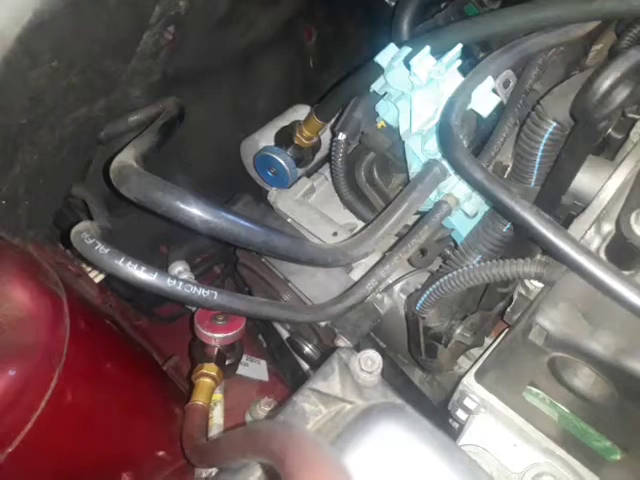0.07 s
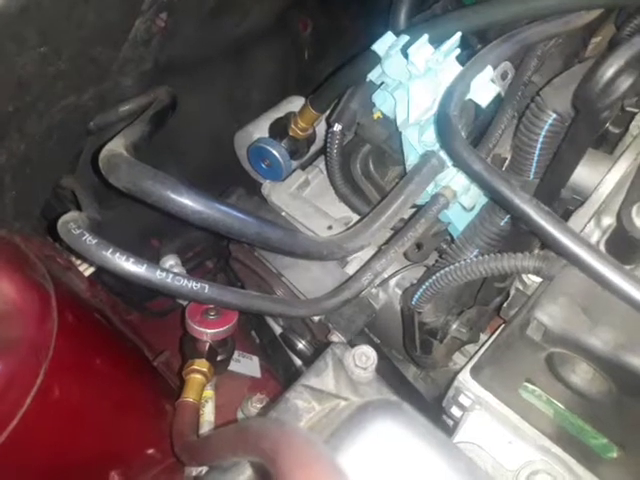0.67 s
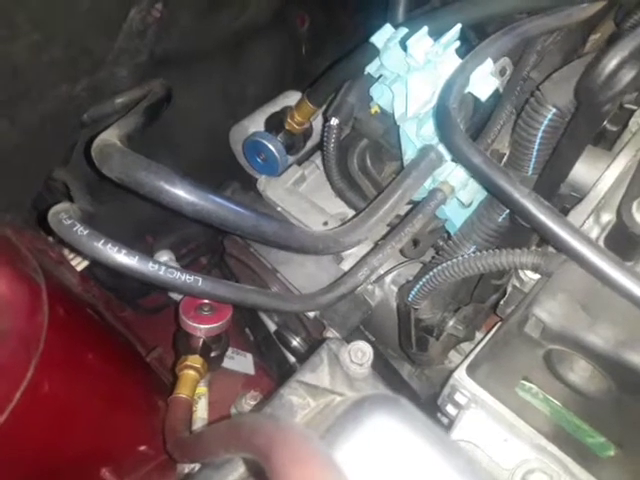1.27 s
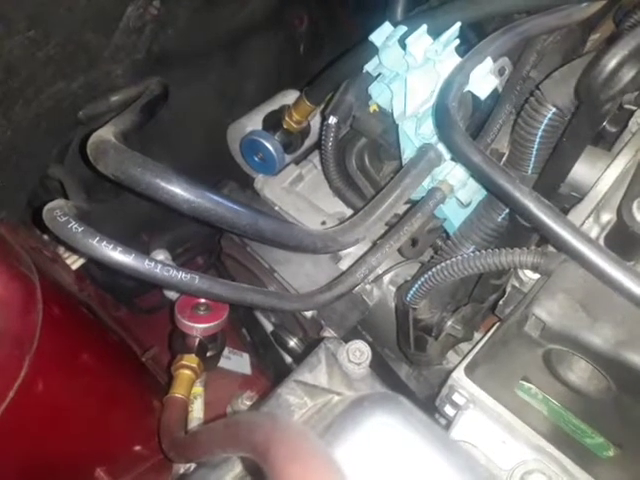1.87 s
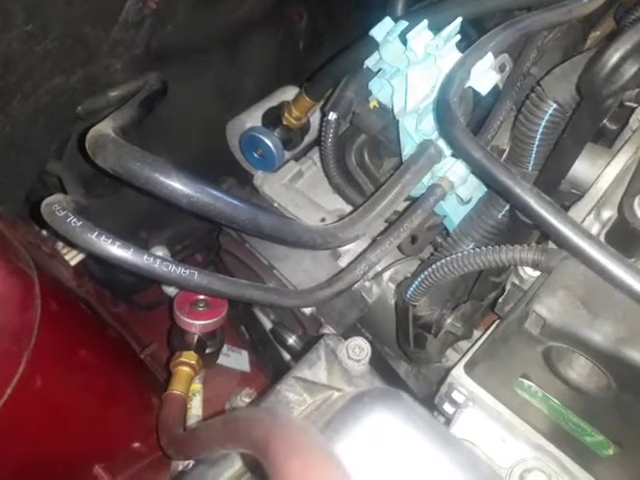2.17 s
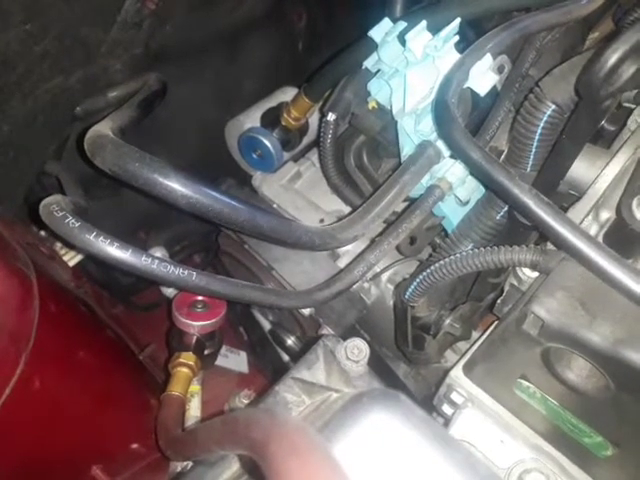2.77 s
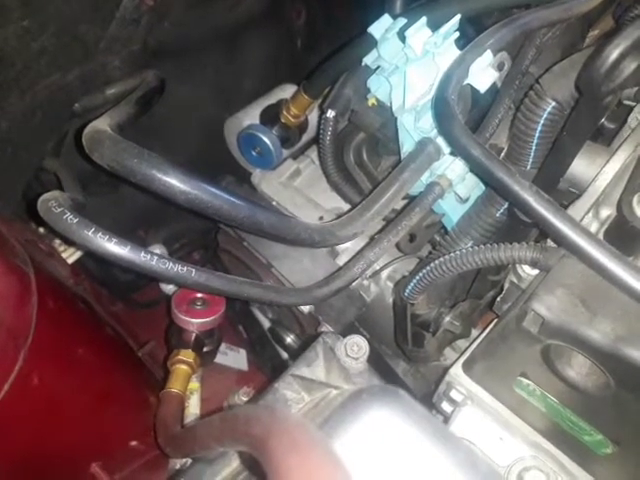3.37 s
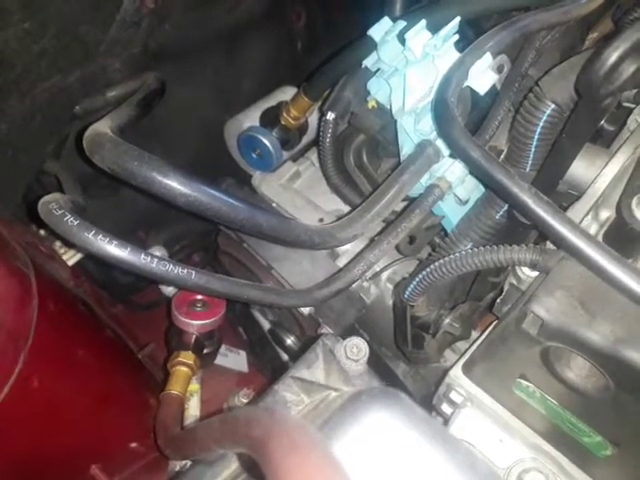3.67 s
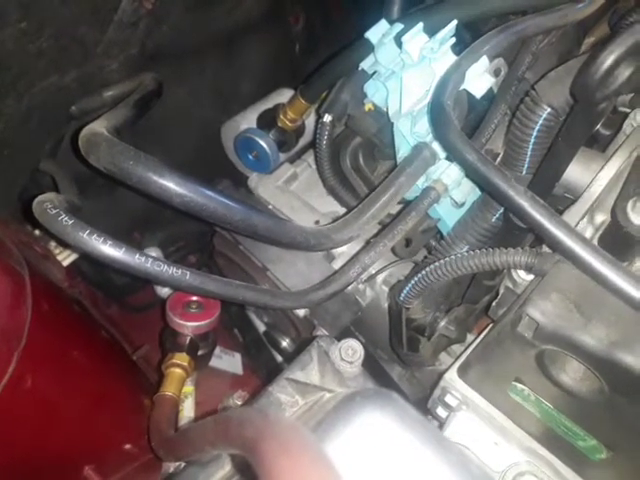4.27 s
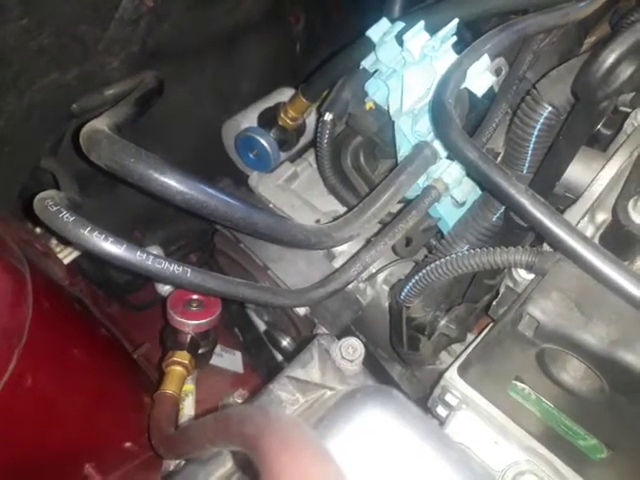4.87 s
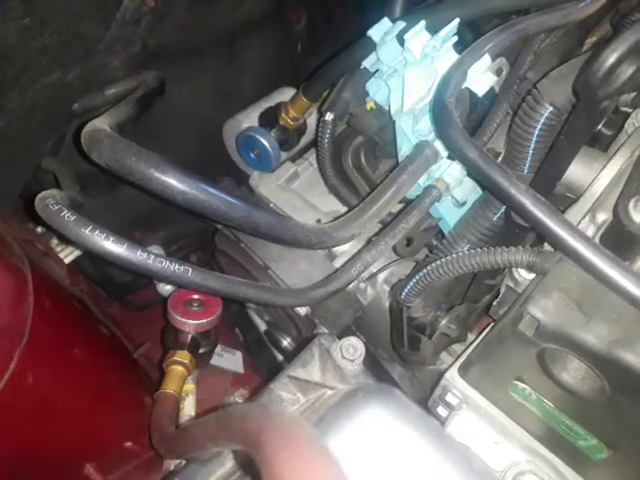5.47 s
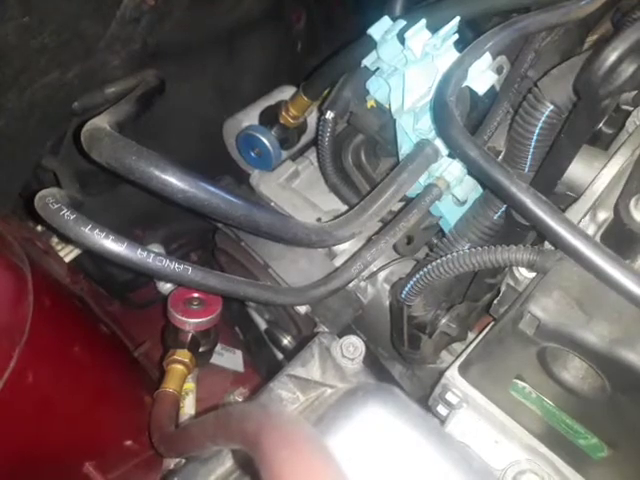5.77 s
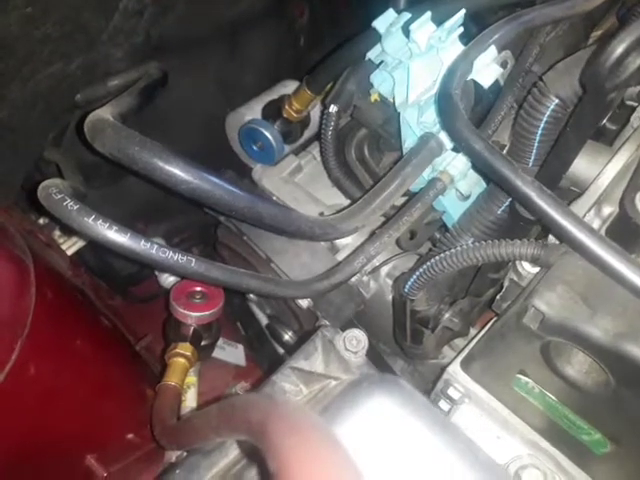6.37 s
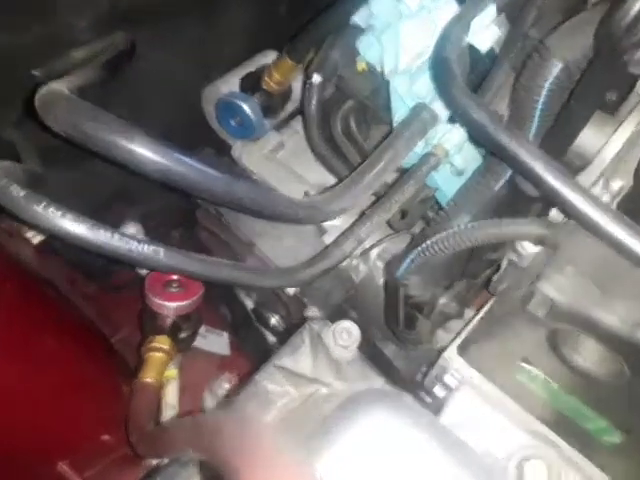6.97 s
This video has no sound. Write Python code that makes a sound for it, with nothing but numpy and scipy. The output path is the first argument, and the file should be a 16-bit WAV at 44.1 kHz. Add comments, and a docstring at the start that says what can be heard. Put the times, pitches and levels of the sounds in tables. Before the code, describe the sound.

Fast, regular metallic knocking and ticking from a car's air-conditioning compressor, close up, over engine hum and hiss.

```python
"""An idling car, bonnet open, the microphone close to the rattling air-conditioning compressor.
A loud rush opens the sound and dies within a second, leaving engine hum and belt hiss in the bay.
Every shaft turn gives a light tick, then a hard knock; both ring the same metal, whose close modes
near 3.3 kHz beat and whine. The level grows slowly as the microphone creeps closer, and a limiter
holds the knocks down. At about 5.4 s the rhythm slips once, then carries on."""
import sys
import numpy as np
from scipy import signal
from scipy.fft import rfft, irfft, next_fast_len
from scipy.io import wavfile
from scipy.ndimage import uniform_filter1d

SR = 44100
rng = np.random.default_rng(int(sys.argv[2]) if len(sys.argv) > 2 else 0)


def dump_mix(stems):
    """Bounce the given channels to the path in sys.argv[1] as a 16-bit WAV at rate SR."""
    frames = np.atleast_2d(stems).T  # one column per channel
    limited = np.clip(frames, -1, 1)  # hard clip at full scale
    pcm = np.round(limited * 32767).astype(np.int16)
    wavfile.write(sys.argv[1], SR, pcm)


N = 314433

# modes of the compressor's metal:
# (frequency [Hz], t60 [s], level in a knock [dB], level in a tick [dB], left minus right [dB])
METAL_MODES = [(256, 0.023, -26.5, -35, -11), (271.4, 0.12, -42.5, -47, 3), (339.3, 0.43, -54.5, -50, 11.5),
               (492.4, 0.12, -39.5, -47, 5), (547, 0.017, -25, -28, -5), (965, 0.075, -65, -33.5, 3),
               (1065, 0.043, -37, -37.5, 11.5), (1225.4, 0.064, -19.5, -25, -19),
               (1397, 0.064, -25.5, -26.5, 4), (1536, 0.012, -17, -26, -22), (1660, 0.072, -54, -39, -10),
               (1964, 0.051, -23, -25, -1), (2268, 0.057, -40, -24, 2.5), (2576, 0.035, -14.5, -10, -8),
               (2597, 0.0091, -8.5, -2.5, -7.5), (2916, 0.012, -6, -4, -13.5), (3236, 0.049, -22, -7, -45),
               (3247, 0.068, -3, -6, -9.5), (3382.5, 0.027, 3.5, -4, 0), (3394.7, 0.021, -3, -8.5, 7),
               (3573, 0.015, -10, -32, 1.5), (3972, 0.039, -14, -19.5, -11), (4130, 0.025, -17, -57, -3),
               (4870, 0.033, -26, -26, -3), (5830, 0.013, -27, -42, 7), (6105, 0.0073, -21, -34, 11),
               (6240, 0.024, -30, -50, 14.5), (6680, 0.012, -30.5, -21, -22)]
# clatter of a hard contact: (frequency [Hz], relative level [dB])
CONTACT_SPECTRUM = [(150, -47), (300, -25), (700, -34), (1300, 0.5), (1750, 5), (2500, 2.5), (4200, 5),
                    (5200, -0.5), (6800, -0.5), (7900, -8.5), (10000, -13), (13600, -7), (14500, -6),
                    (16000, -34)]


def amp(db):
    """Decibels to gain."""
    return 10 ** (np.asarray(db) / 20)


def unit_rms(x):
    """Scales to rms 1."""
    return x / np.sqrt(np.mean(x ** 2) + 1e-20)


def curve_at(points, hz):
    """Reads a table on a log-frequency axis."""
    f, value = np.transpose(points)
    return np.interp(np.log(hz + 1), np.log(f + 1), value)


def add(mix, start_s, sound):
    """Lays a stereo sound into the mix."""
    part = mix[:, max(round(start_s * SR), 0):][:, :sound.shape[1]]
    part += sound[:, :part.shape[1]]


def drift(rate_hz):
    """A random wander of rms 1, mostly slower than rate_hz."""
    hz = np.fft.rfftfreq(N, 1 / SR)
    return unit_rms(irfft(rfft(rng.standard_normal(N)) * np.exp(-(hz / rate_hz) ** 2), N))


def bay_noise(spectrum, size):
    """Noise as the microphone hears it in the bay: nearly mono bass, treble stronger on the right."""
    # likeness of the two channels: (frequency [Hz], correlation [-1 to 1])
    correlation = [(40, 0.8), (200, 0.9), (500, 0.75), (1000, 0.24), (2000, -0.54), (4000, -0.32),
                   (16000, -0.038)]
    # stereo balance: (frequency [Hz], left minus right [dB])
    balance = [(50, 4), (300, 2.5), (1200, 2.5), (3000, -5.5), (6000, -1), (9000, -4), (15000, 1)]
    # peaks and dips from the bay's hollows and panels: (centre [Hz], width [Hz], gain [dB])
    hollows = [(503, 60, 1.5), (713, 136, -2.5), (935, 115, 5), (1144, 96, 3.5), (1380, 35, -1),
               (1330, 20, 5), (1550, 98, 1), (2040, 53, -3.5), (2176, 72, 4), (2755, 100, 3.5),
               (2910, 93, -10), (5250, 125, -7.5), (5700, 240, 3), (6980, 280, 5), (13200, 250, -5)]
    fft_size = next_fast_len(size)
    hz = np.fft.rfftfreq(fft_size, 1 / SR)
    right, other = rfft(rng.standard_normal((2, fft_size)))
    same = np.clip(curve_at(correlation, hz), -1, 1)
    left = (same * right + np.sqrt(1 - same ** 2) * other) * amp(curve_at(balance, hz))
    hollows_db = sum(db * np.exp(-((hz - centre) / width) ** 2) for centre, width, db in hollows)
    coloured = np.array([left, right]) * amp(curve_at(spectrum, hz) + hollows_db)
    return unit_rms(irfft(coloured, fft_size)[:, :size])


def opening_rush(hold_s=.3, sag_db_per_s=18, release_at_s=.69, release_db_per_s=110):
    """A fluttering rush holds, sags, then dies quickly: hiss on the right, rumble on both sides."""
    # rumble and hiss: (frequency [Hz], relative level [dB])
    rush_spectrum = [(30, -20), (100, -3.5), (200, -5), (600, -44), (2100, -18), (2700, 8.5), (3300, 8),
                     (3900, 5), (4800, 0.5), (5600, -12), (7000, -16), (10000, -18), (16000, -37)]
    left, right = bay_noise(rush_spectrum, size=N)
    rumble = signal.lfilter(*signal.butter(2, 400, fs=SR), left)
    t = np.arange(N) / SR
    sag_db = sag_db_per_s * np.maximum(t - hold_s, 0)
    release_db = release_db_per_s * np.maximum(t - release_at_s, 0)
    flutter_db = 2.2 * drift(rate_hz=70)
    return np.array([rumble, right]) * amp(-22.5 - sag_db - release_db + flutter_db)


def engine_hum(shaft_hz):
    """Fluttering harmonics of the shaft, and a low tone that swells about once a second."""
    # engine orders: (frequency [multiples of the shaft rate], level [dB])
    orders = [(4, -81), (7, -62.5), (11, -61.5), (13, -48.5), (14, -52.5), (15, -51.5), (16, -43.5),
              (17, -56.5), (19, -46.5), (25, -53.5), (28, -49.5), (33, -55), (52, -50), (70, -69)]
    t = np.arange(N) / SR
    turns = shaft_hz * t + .006 * drift(rate_hz=2.17)
    hum = np.zeros(N)
    for order, db in orders:
        flutter = 1 + .48 * drift(rate_hz=18.5)
        hum += amp(db) * flutter * np.sin(2 * np.pi * (order * turns + rng.random()))
    swell = np.cos(np.pi * (t - .57) / 1.12) ** 20
    return np.sqrt(2) * (hum + amp(-47) * swell * np.sin(2 * np.pi * 154 * t))


def belt_hiss():
    """Belts and fan fill the bay with a slightly uneven wash."""
    # belts, fan and moving air: (frequency [Hz], relative level [dB])
    wash_spectrum = [(25, -36), (90, -14.5), (160, -8), (260, -5), (450, 0), (750, -1.5), (1300, -6),
                     (1700, 2), (3000, 4), (4600, -1), (6800, -10), (8200, -21.5), (13500, -18),
                     (16000, -21)]
    return amp(-28.5) * bay_noise(wash_spectrum, size=N) * amp(1.42 * drift(rate_hz=55))


def whine(hz, width_hz, db):
    """Rubbing keeps the metal's strongest mode singing between the blows, mostly on the right."""
    resonance = signal.iirpeak(hz, hz / width_hz, fs=SR)
    rub = rng.standard_normal(N) + .97 * rng.standard_normal((2, N))
    return amp(db) * unit_rms(signal.lfilter(*resonance, rub)) * amp([[-7], [0]])


def blow_times(shaft_hz, first_knock_s=.1011, tick_lead_s=.0184, slip_at_s=5.4, slip_s=.0356):
    """A tick and a knock each turn; at the slip one tick comes alone and all that follows is late."""
    steady = np.arange(first_knock_s, N / SR, 1 / shaft_hz)
    due = steady + .0005 * np.cos(2 * np.pi * (steady - 2.0) / 4.1)  # the idle hunts slowly
    slipped = due > slip_at_s
    jitter_s = .00008 * rng.standard_normal(len(due))
    knock_s = due + slip_s * slipped + jitter_s
    tick_s = np.append(knock_s, due[slipped][0]) - tick_lead_s
    return knock_s, tick_s


def metal_ring(times, force, mode_db, scatter_db):
    """Each blow rings the metal a little differently; neighbouring modes start opposed, swell and beat."""
    hz, t60, _, _, left_db = np.transpose(METAL_MODES)
    t = np.arange(SR // 8) / SR
    modes = np.sin(2 * np.pi * hz[:, None] * t) * amp(-60 * t / t60[:, None])
    stereo_gain = np.array([amp(left_db), np.ones(len(hz))]) * (-1) ** np.arange(len(hz))
    out = np.zeros((2, N))
    for start_s, strength, scatter in zip(times, force, rng.standard_normal((len(times), len(hz)))):
        add(out, start_s, strength * (stereo_gain * amp(mode_db + scatter_db * scatter)) @ modes)
    return out


def clatter(times, force, spectrum, rise_s, fall_s, tail_db, tail_s, alike):
    """Each contact is a noise burst with a tail from the bay; the share `alike` repeats every time."""
    t = np.arange(SR // 10) / SR
    attack = 1 - np.exp(-(t / rise_s) ** 2)
    decay = np.hypot(np.exp(-t / fall_s), amp(tail_db) * np.exp(-t / tail_s))
    pieces = len(times) + 1
    casing, *fresh = np.split(bay_noise(spectrum, size=len(t) * pieces), pieces, axis=1)
    out = np.zeros((2, N))
    for start_s, strength, loose in zip(times, force, fresh):
        burst = np.sqrt(alike) * casing + np.sqrt(1 - alike) * loose
        add(out, start_s, strength * attack * decay * burst)
    return out


def knocks(times):
    """The hard blow of each turn; the engine's two-turn cycle makes them strong and weak by turns."""
    force = amp(.5 * (-1) ** np.arange(len(times)) + .5 * rng.standard_normal(len(times)))
    _, _, knock_db, _, _ = np.transpose(METAL_MODES)
    ring = metal_ring(times, force, knock_db, scatter_db=1.0)
    grit = clatter(times - .0005, force, CONTACT_SPECTRUM,
                   rise_s=.00084, fall_s=.0044, tail_db=-16.5, tail_s=.013, alike=.5)
    return amp(-2.5) * ring + amp(-10.5) * grit


def ticks(times):
    """The lighter, looser blow as the slack is taken up, and its soft rebound 4 ms later."""
    # clatter of a light contact: (frequency [Hz], relative level [dB])
    tick_spectrum = [(200, -47.5), (700, -31), (1200, 4), (1750, 1), (2700, -1), (3600, -3), (5000, 0),
                     (6800, -1), (8000, -6.5), (10000, -12), (13000, -7), (16000, -18)]
    _, _, knock_db, tick_db, _ = np.transpose(METAL_MODES)
    jitter, unevenness, rebound_jitter = rng.standard_normal((len(times), 3)).T
    times = times + .00018 * jitter
    force = amp(.8 * unevenness)
    ring = metal_ring(times, force, tick_db, scatter_db=1.42)
    rebound = metal_ring(times + .004 + .0002 * rebound_jitter, force, knock_db, scatter_db=0)
    grit = clatter(times - .0005, force, tick_spectrum,
                   rise_s=.0025, fall_s=.0035, tail_db=-29, tail_s=.013, alike=.21)
    return amp(-3) * ring + amp(-13.5) * rebound + amp(-14) * grit


def stray_clicks(per_s, db, spread_db, slot_s=.01):
    """Faint clicks of belts and valve gear fall at random among the blows."""
    slots = np.arange(0, N / SR, slot_s)
    chance, offset, softness = rng.random((3, len(slots)))
    heard = chance < per_s * slot_s
    times = (slots + offset * slot_s)[heard]
    force = amp(-spread_db * softness)[heard]
    return amp(db) * clatter(times, force, CONTACT_SPECTRUM,
                             rise_s=.00065, fall_s=.0024, tail_db=-21, tail_s=.0068, alike=0)


def microphone_gain(t, hold_s=.44, settle_s=.42):
    """A loud opening, mostly on the right, settles; then the level rises as the microphone nears."""
    opening = np.clip(1 - (t - hold_s) / settle_s, 0, 1)
    left_db = -2.07 + .305 * t + 2.1 * opening
    right_db = -.3 + .27 * t + 6 * opening
    return amp([left_db, right_db])


def limiter(x, ceiling_db, recover_db_per_s):
    """Turns both channels down at once on a peak and recovers quickly."""
    over_db = np.maximum(20 * np.log10(abs(x).max(0) + 1e-9) - ceiling_db, 0)
    recovery_db = np.arange(N) * recover_db_per_s / SR
    held_db = np.maximum.accumulate(over_db + recovery_db) - recovery_db
    return x * amp(-uniform_filter1d(held_db, size=30))


def scene():
    """The compressor close up, over the running engine; it reaches the microphone's left port first."""
    shaft_hz, left_lead_s = 17.279, .00007
    knock_s, tick_s = blow_times(shaft_hz)
    singing = whine(hz=3260, width_hz=120, db=-30)
    left, right = knocks(knock_s) + ticks(tick_s) + singing
    compressor = np.array([np.roll(left, -round(left_lead_s * SR)), right])
    clicks = stray_clicks(per_s=22, db=-22.5, spread_db=8)
    return compressor + clicks + engine_hum(shaft_hz) + belt_hiss() + opening_rush()


def record(dry):
    """The microphone opens abruptly and thins the bass; then limiter, clipping and band limit."""
    open_s, top_hz = .105, 16100
    t = np.arange(N) / SR
    thin = signal.lfilter(*signal.butter(1, 90, "high", fs=SR), dry)  # small ports lose the deep bass
    loud = thin * microphone_gain(t) * (t > open_s)
    held = np.clip(limiter(loud, ceiling_db=-.44, recover_db_per_s=696), -1, 1)
    band_limit = signal.firwin(301, top_hz, window=("kaiser", 8), fs=SR)
    return signal.oaconvolve(held, band_limit[None], "same")


dry = scene()
out = record(dry)
dump_mix(out)
```